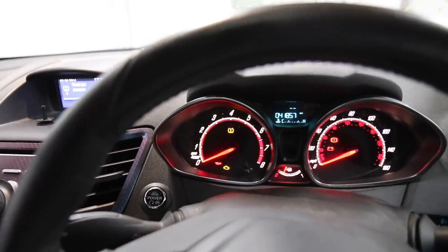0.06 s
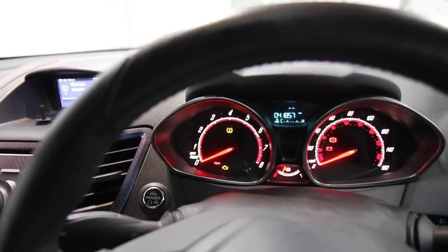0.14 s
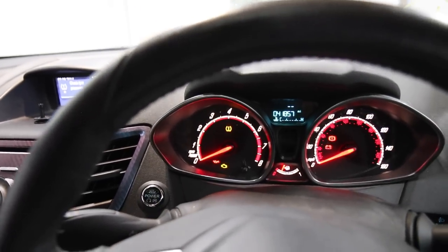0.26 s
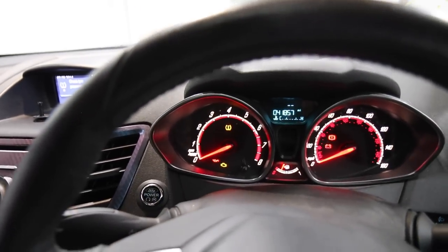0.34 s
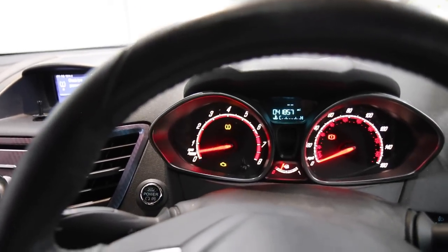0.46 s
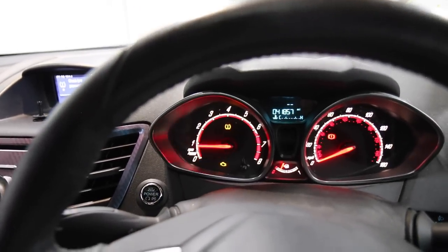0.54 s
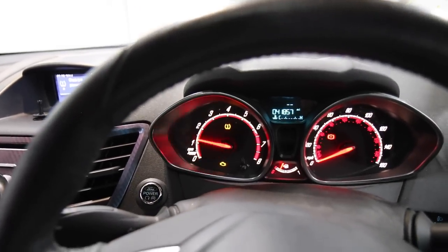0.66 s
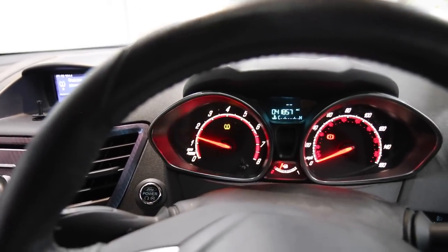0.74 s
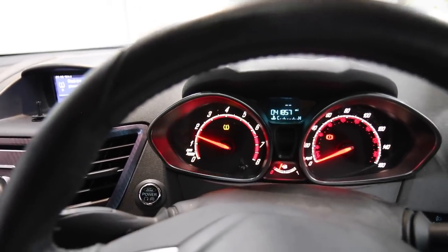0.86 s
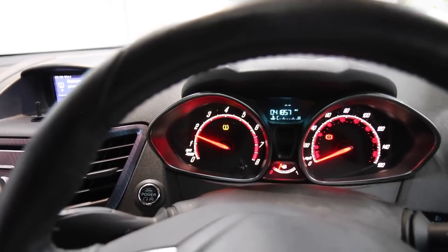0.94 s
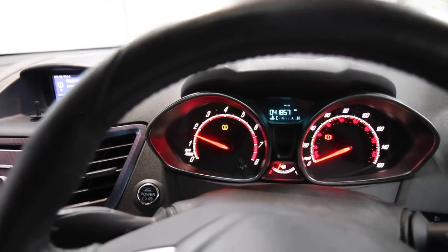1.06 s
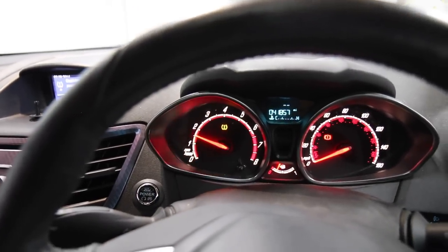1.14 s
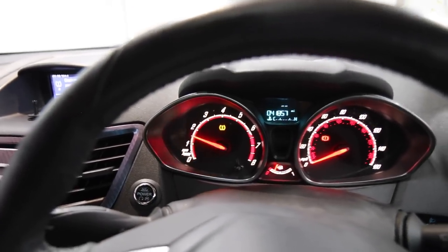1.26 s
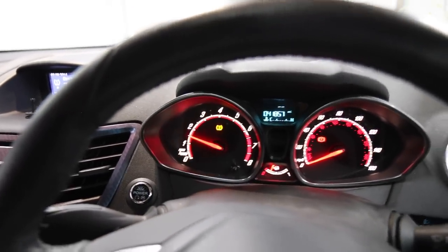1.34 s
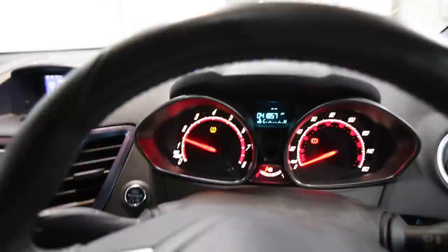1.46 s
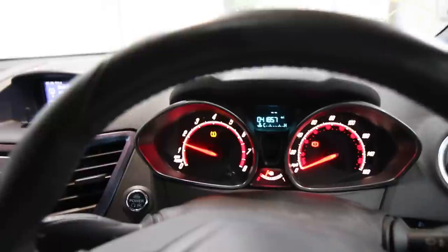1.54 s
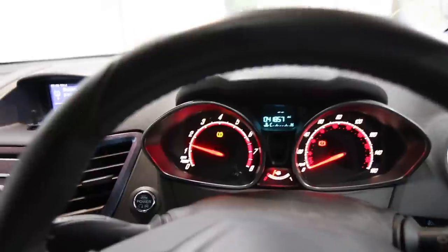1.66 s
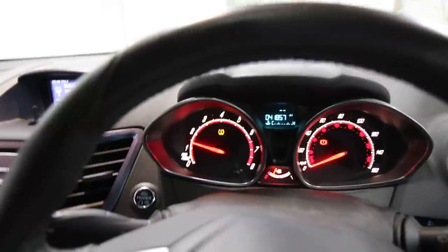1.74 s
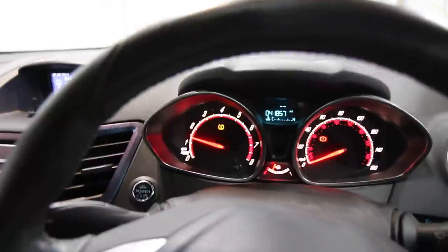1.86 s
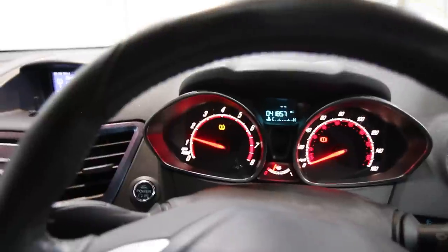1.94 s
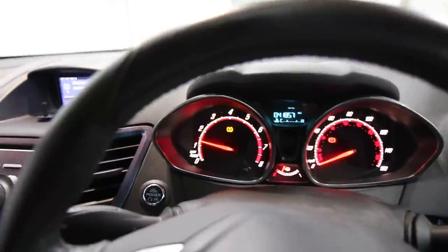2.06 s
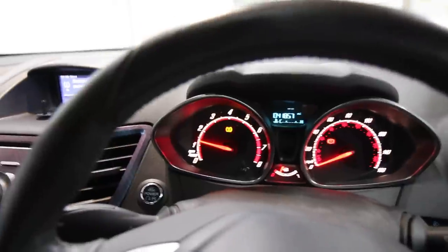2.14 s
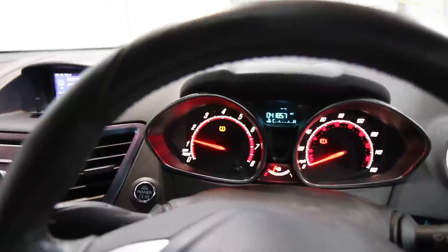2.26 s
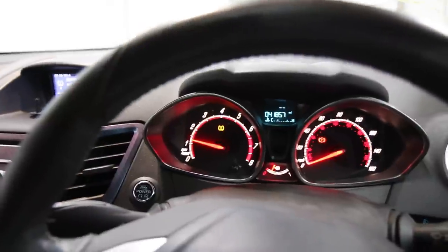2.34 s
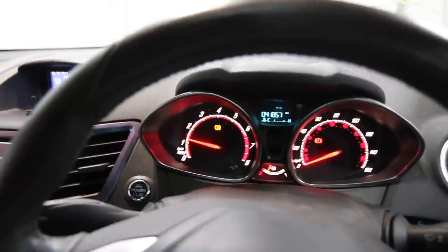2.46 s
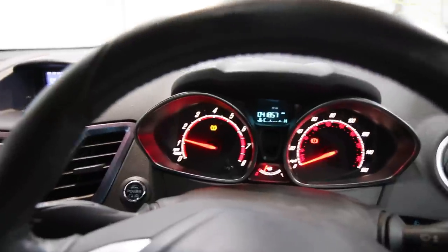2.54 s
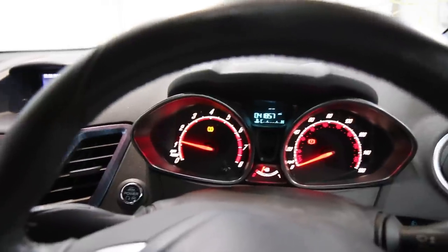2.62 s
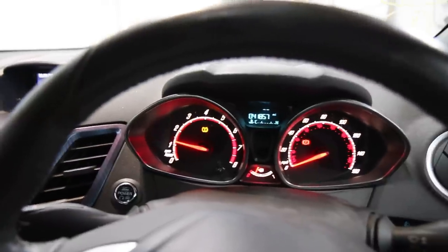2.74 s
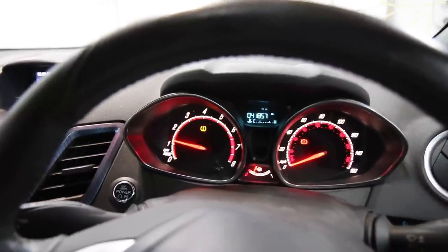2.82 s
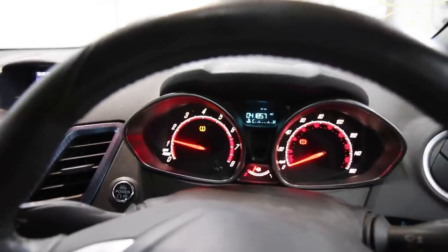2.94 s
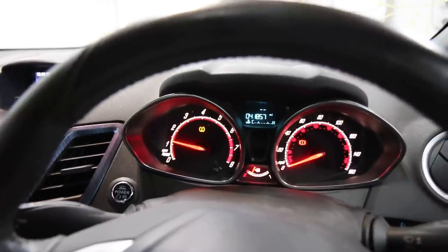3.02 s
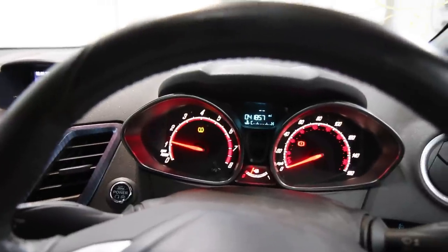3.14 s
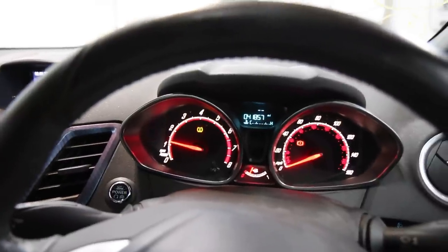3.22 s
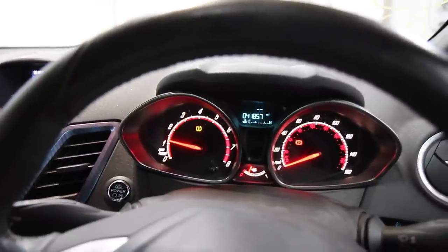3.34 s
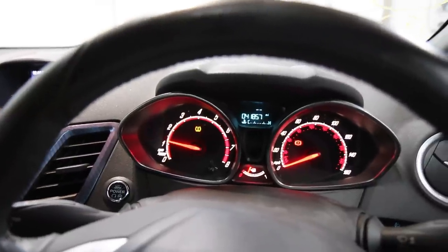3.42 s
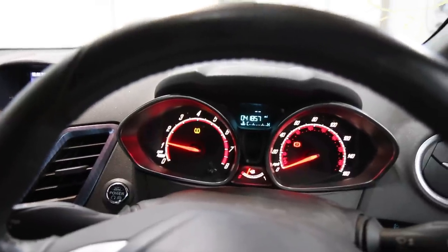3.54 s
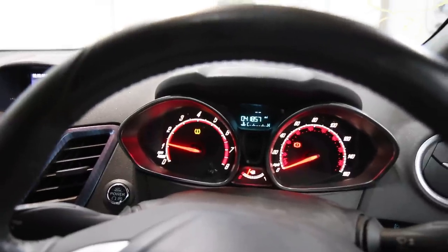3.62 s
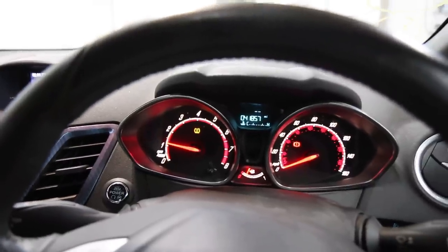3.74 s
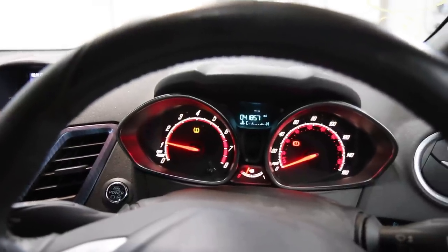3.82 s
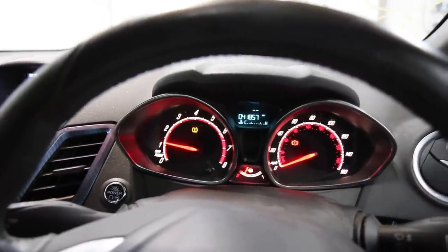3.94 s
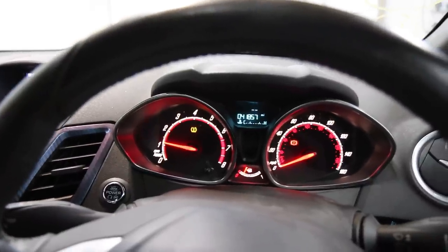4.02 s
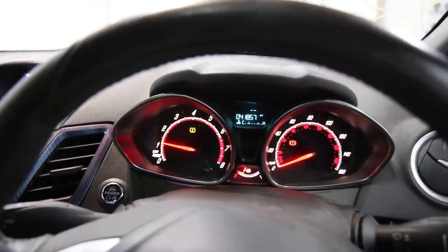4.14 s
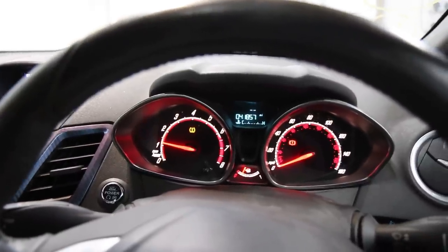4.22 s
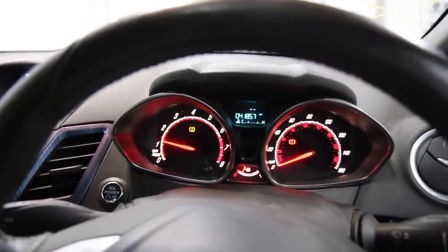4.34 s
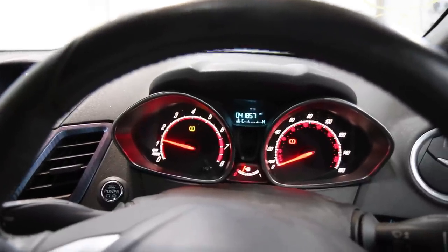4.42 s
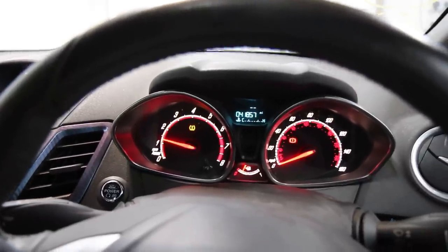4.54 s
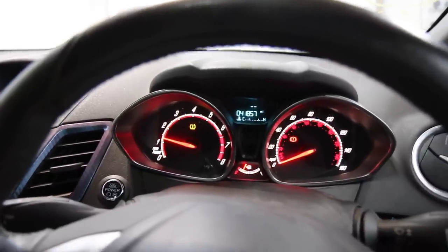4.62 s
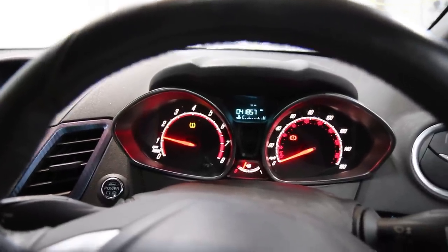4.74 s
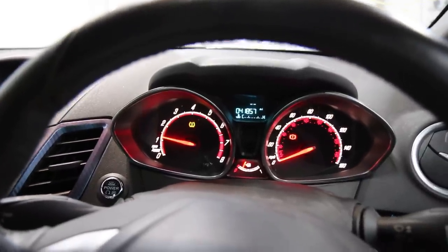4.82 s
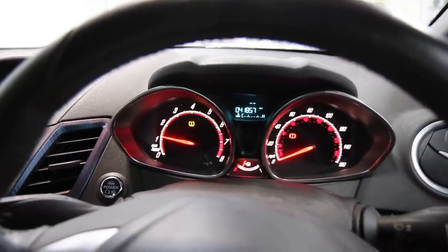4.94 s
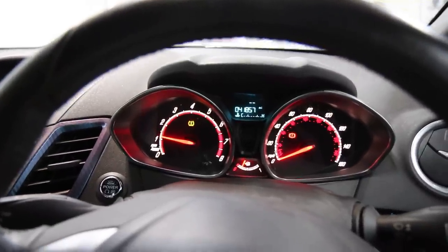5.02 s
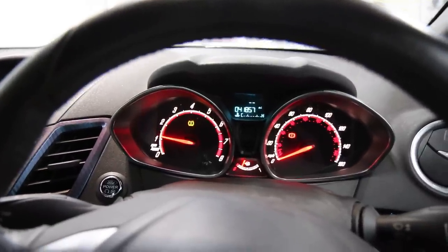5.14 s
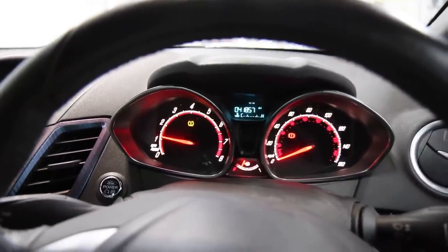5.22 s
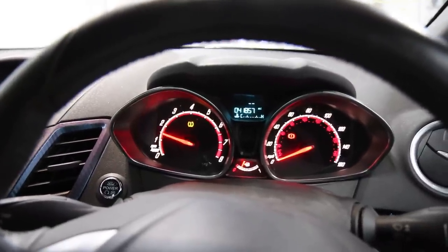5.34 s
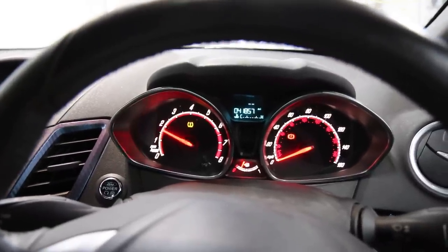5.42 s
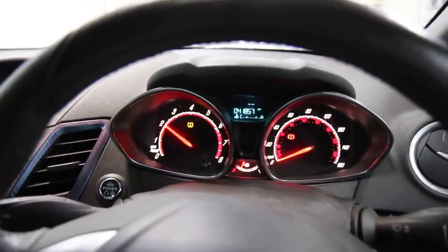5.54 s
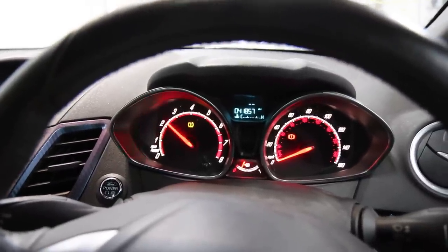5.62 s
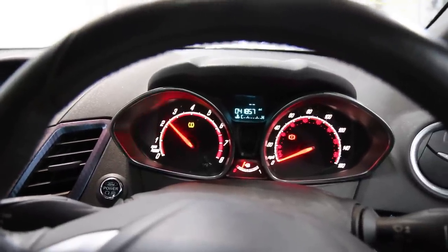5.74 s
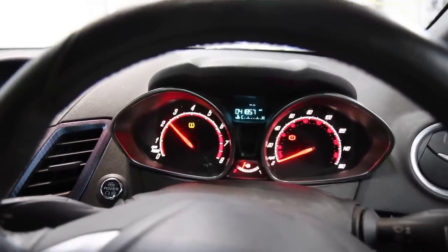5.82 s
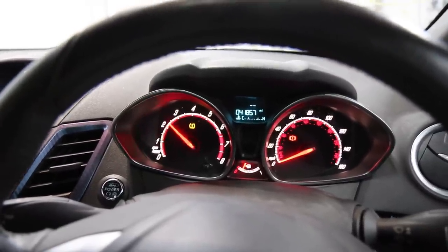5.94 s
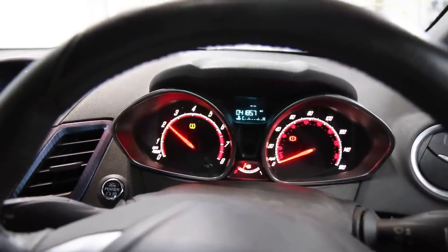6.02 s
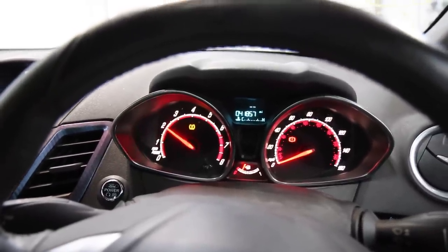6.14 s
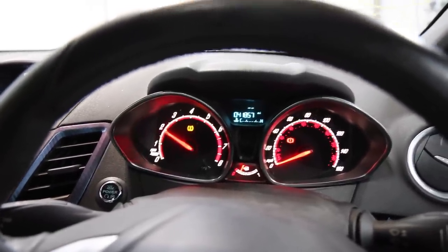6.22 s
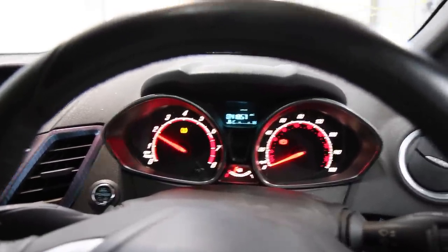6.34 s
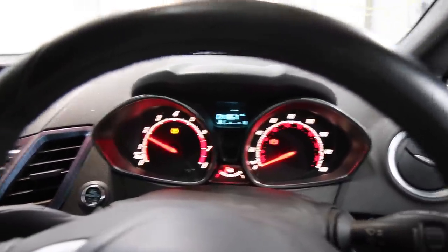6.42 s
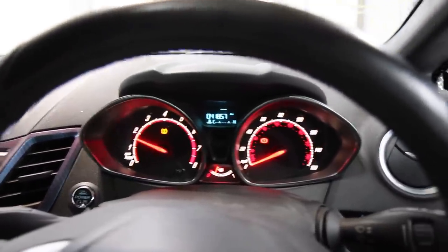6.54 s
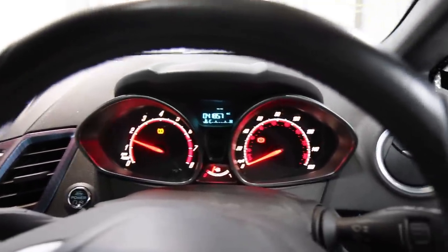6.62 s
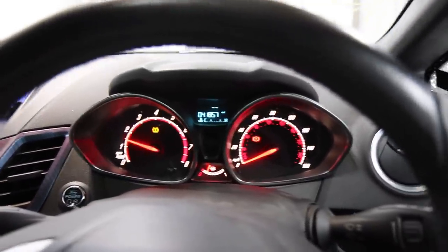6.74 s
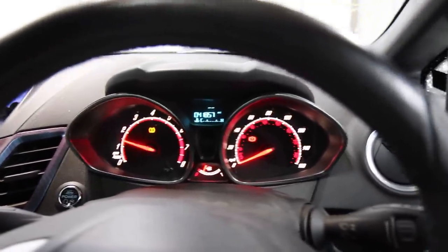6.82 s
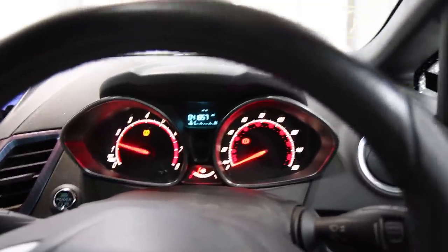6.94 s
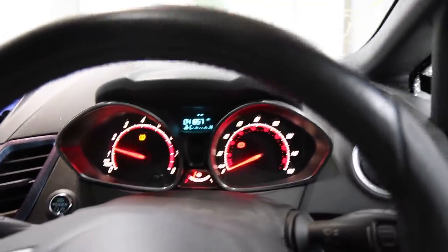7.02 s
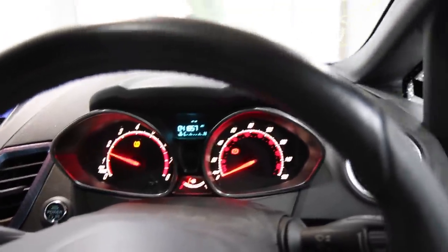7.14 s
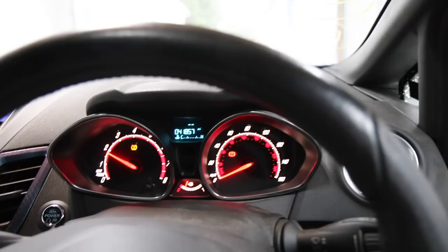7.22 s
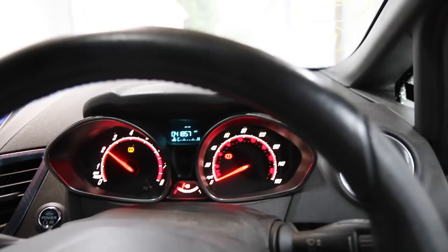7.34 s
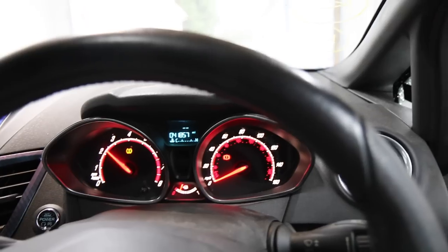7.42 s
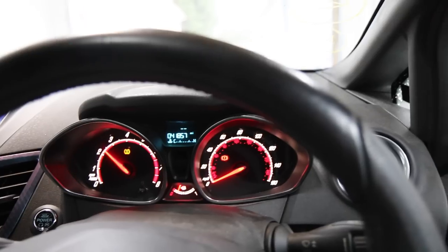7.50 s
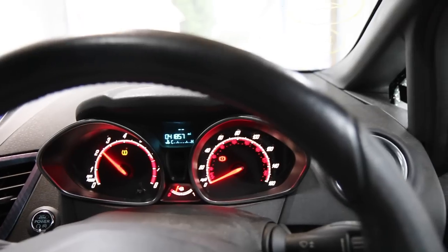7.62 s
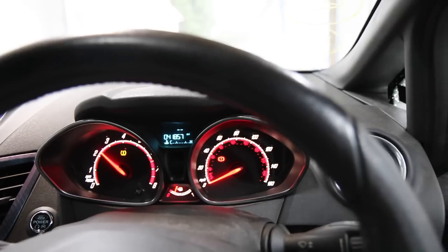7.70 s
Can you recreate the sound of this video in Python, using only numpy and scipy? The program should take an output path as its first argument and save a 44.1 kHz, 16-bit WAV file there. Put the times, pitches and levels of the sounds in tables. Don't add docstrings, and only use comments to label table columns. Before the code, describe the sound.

Inside a closed car, close to the driver's seat, a starter clunks and shudders for half a second before a four-cylinder engine catches and flares. It sinks into a deep, booming fast idle with soft trim knocks, tiny ticks and a faint rubber squeak. After a slight nudge of throttle come two quick growling revs, the second held to the end. A handheld microphone ducks under the bass.

```python
import sys
import numpy as np
from scipy import signal
from scipy.fft import rfft, irfft, next_fast_len
from scipy.io import wavfile
from scipy.ndimage import uniform_filter1d, minimum_filter1d, map_coordinates

SR = 44100
rng = np.random.default_rng(int(sys.argv[2]) if len(sys.argv) > 2 else 0)


def how_loud(loudness_db):
    steps = np.asarray(loudness_db, float) / 20
    return 10 ** steps


def store_wav(level_fs):
    pcm = np.round(np.clip(np.atleast_2d(level_fs), -1, 1) * 32767)
    wavfile.write(sys.argv[1], SR, pcm.T.astype(np.int16))


N = 342591

# time_s, firing_rate_hz
ENGINE_SPEED = [(0.2, 19.6), (0.43, 31), (0.62, 50), (0.8, 53.7), (1.95, 42.1), (2.5, 40.4), (4.12, 37.5),
                (4.36, 45.6), (4.72, 39), (5.18, 37.2), (5.5, 79), (5.66, 83), (6.1, 63.2), (6.55, 49.2),
                (6.97, 42.4), (7.33, 82.5), (7.55, 77.6), (7.77, 75.4)]
# time_s, load_over_idle_db
ENGINE_LOAD = [(.2, 3), (.62, 5.5), (1.3, 3), (2.05, 1), (4.1, -1.5), (4.36, 7), (4.7, 0.5), (5.1, -0.5),
               (5.22, 9), (5.33, 11), (5.7, 12.5), (6.0, 7), (6.5, -6.5), (6.85, -1.5), (7.06, 10),
               (7.2, 8.5), (7.45, 10), (7.77, 6)]
# order_pitch_hz, level_db_rms
FIRST_ORDER_PATH = [(15, -31), (30, -24), (40, -15.5), (45, -21.5), (52, -8.5), (60, -5.5), (73, -5.5),
                    (90, -22)]
SECOND_ORDER_PATH = [(30, -26.5), (64, -12), (76, -18), (89, -34.5), (101, -23), (111, -38.5), (125, -16),
                     (175, -40.5)]
THIRD_ORDER_PATH = [(60, -24.5), (113, -39), (120.5, -27), (126, -29.5), (133, -21.5), (150, -45),
                    (195, -28.5), (250, -21.5)]
UNEVEN_ORDER_PATH = [(10, -29), (21, -24.5), (29, -32), (33, -43), (39, -39.5), (45, -25.5), (57.5, -20),
                     (66, -49.5)]
# time_s, second_order_rise_db, half_length_s
SECOND_ORDER_SWELLS = [
    (4.19, 7.5, 0.073),
    (5.16, 8.5, 0.055),
    (6.97, 11, 0.046),
]
# centre_hz, width_hz, level_db
AIR_MODES = [(58.4, 2.1, 4), (74.75, 2.1, -10)]
# centre_hz, width_hz, level_db
CABIN_RESONANCES = [(136.8, 20, 4.5), (153.7, 2, -2), (182.1, 15, 1), (248.8, 26.5, 3.5), (324, 19.4, 1.5),
                    (370, 45, -3), (445.9, 12.7, 3), (484.4, 12, -1), (575, 42, -13.5), (665, 65, -12),
                    (790, 180, -19)]
# frequency_hz, density_db_per_hz
PANEL_SPECTRUM = [(26, -31.5), (45, -4.5), (64, -0.5), (97, -11.5), (156, -18), (212, -18.5), (284, -34.5),
                  (443, -10), (478, -35), (562, -46), (600, -42), (780, -75), (1320, -120)]
# frequency_hz, density_db_per_hz
VALVE_SPECTRUM = [(310, -19.5), (520, 4), (592, -15), (679, -2.5), (1010, -10.5), (1310, -15.5),
                  (1970, -25), (2160, -26), (2770, -39.5), (3200, -34.5), (4160, -64), (7040, -120)]
# time_s, rise_db, half_length_s
VALVE_CLATTER = [
    (0, 17.5, 0.03),
    (.24, 11, .18),
    (5.27, 4, 0.1),
    (7.07, 3, 0.076),
    (7.55, 2.5, .15),
]
# centre_hz, width_hz, level_db
WHINE_RESONANCES = [(2080, 60, -4), (2186, 70, 0), (2235, 60, -3), (2390, 60, -5), (4000, 300, -9)]
# time_s, rise_db, half_length_s
WHINE_SWELLS = [(0, 13.5, .3), (.6, 20, 0.18), (1.7, 10.5, .5), (2.5, 14, .15), (3.42, 17, 0.17),
                (3.95, 13, .06), (6.03, 15.5, 0.11), (6.6, 16, 0.19), (7.57, 14, .1)]
# time_s, rise_over_shudder_db
COMPRESSION_STROKES = [
    (0, 10),
    (0.274, 20),
    (0.404, 21),
    (0.491, 19.5),
    (.56, 14),
]
# frequency_hz, density_db_per_hz
SHUDDER_SPECTRUM = [(12, -47), (20, -20), (48, -6.5), (65, 2), (97, -7), (150, -11.5), (193, -11),
                    (280, -47), (300, -21), (390, -48), (660, -120)]
# time_s, level_db
PINION_GRIND = [
    (0.17, -63),
    (0.246, -38),
    (0.284, -39),
    (0.344, -64),
    (0.36, -47),
]
# start_s, peak_db, thud_db, bright_db, rise_s
TRIM_KNOCKS = [(0.132, -44, -23, -59, 0.035), (0.19, -55, -19, -74.5, 0.0087),
               (0.311, -43, -17.5, -54, 0.018), (0.363, -34.5, -35, -45, 0.014),
               (0.384, -45, -25.5, -54.5, 0.014), (2.101, -39.5, -9.5, -49.5, 0.015),
               (2.264, -34, -17, -38, 0.015), (2.448, -54, -51, -69, 0.014),
               (2.631, -39.5, -19.5, -57, 0.0069), (2.99, -45, -25.5, -52.5, 0.018),
               (3.015, -45, -31, -51.5, 0.014), (3.054, -48.5, -28, -59, 0.024),
               (3.12, -52, -21.5, -70, 0.011), (3.178, -49.5, -26, -73, 0.0061),
               (3.721, -52, -26.5, -61, 0.013)]
# frequency_hz, density_db_per_hz
TRIM_SPECTRUM = [(500, -42.5), (750, 3), (1000, 11.5), (1700, 3.5), (3000, -4), (4000, -13)]
# start_s, peak_db, pitch_hz
DRY_TICKS = [(0.4617, -46.5, 4770), (0.5117, -45.5, 4910), (0.6444, -52, 4070), (1.7524, -40, 4760),
             (2.8439, -51, 3999), (2.855, -46, 5000), (2.8706, -47, 4960), (2.8915, -49, 5730)]
# start_s, peak_db, pitch_hz
RUBBER_SQUEAKS = [
    (2.976, -38.5, 930),
    (3.052, -33.5, 912),
]
# frequency_hz, density_db_per_hz
RUSTLE_SPECTRUM = [(1470, -34.5), (2500, 2.5), (2760, -1.5), (3110, 0), (4680, -1), (5430, -3.5),
                   (7730, -9), (11000, -24.5), (14300, -40), (22000, -120)]
# time_s, rise_db, half_length_s
CLOTH_SHIFTS = [(0, 13.5, 0.078), (.2, 9.5, 0.12), (.4, 6.5, 0.21), (1.35, 4.5, 0.17), (2.0, 6, 0.2),
                (2.6, 5.5, 0.34), (5.28, 5.5, 0.06), (7.07, 5.5, 0.055), (7.65, 2.5, 0.087)]
# frequency_hz, density_db_per_hz
HISS_SPECTRUM = [(880, -35.5), (1500, 0.5), (3250, -10), (4040, -9), (15100, -11), (16000, -17)]

IDLE_HZ, INERTIA_S = 40, .09
GROWL_DB, GEAR_DB, WHINE_DB, RUSTLE_DB, HISS_DB = -29.5, -48, -78, -62, -66
BOOM_GROWS, UPPER_GROWS, PANEL_GROWS, GEAR_GROWS = 0.34, .4, 1, .15
REV_GROWS, RUSTLE_GROWS = 1.09, .9
BUILD_S = 0.03
BETWEEN_DB, STROKE_S = -33, 0.052
LIMIT_DB, SQUEEZE = -5, 0.62
HOLD_S, ATTACK_S, MEMORY_S, MEMORY_SHARE = .12, 0.0098, 0.72, 0.49


def engine():
    hz, cycles, load_db = firing()
    running = np.clip((np.arange(N) / SR - .2) / 0.077, 0, 1)
    return running * (boom(hz, cycles, load_db) + growl(hz, cycles, load_db) + panels(load_db))


def firing():
    hz = uniform_filter1d(curves(ENGINE_SPEED)[0], round(INERTIA_S * SR), mode="nearest")
    return hz, np.cumsum(hz) / SR, curves(ENGINE_LOAD)[0]


def boom(hz, cycles, load_db):
    def tone(order, lag):
        return np.sqrt(2) * np.sin(2 * np.pi * (order * cycles + lag))

    first_db = along(FIRST_ORDER_PATH, hz) + BOOM_GROWS * load_db
    second_db = along(SECOND_ORDER_PATH, hz * 2) + UPPER_GROWS * load_db + swells(SECOND_ORDER_SWELLS)
    third_db = along(THIRD_ORDER_PATH, hz * 3) + UPPER_GROWS * load_db
    uneven_db = along(UNEVEN_ORDER_PATH, hz * 3 / 4) + UPPER_GROWS * load_db

    out = lagged(how_loud(first_db + 0.41 * wobble(1.8)), BUILD_S) * tone(0.99, 0.21)
    out += how_loud(second_db + 2.1 * wobble(9.9)) * tone(2, 0.28)
    out += how_loud(third_db + 3.7 * wobble(14)) * tone(3, 0.27)
    uneven = tone(3 / 4, 0.084) + how_loud(-10.5) * tone(5 / 4, 0.93) + how_loud(-14) * tone(3 / 2, 0.082)
    out += how_loud(uneven_db + 1.9 * wobble(31)) * uneven
    return out + how_loud(-4) * filtered(out, lambda f: resonant(AIR_MODES, f))


def growl(hz, cycles, load_db):
    growl_db = GROWL_DB + load_db
    out, grid = np.zeros(N), np.arange(1500.)
    response = resonant(CABIN_RESONANCES, grid)
    ringing = response * np.abs(response) ** 0.74
    for quarter in [7, 9, 10, 11, *range(13, 69)]:
        order_hz = hz * quarter / 4
        order_db = -.1 if quarter % 4 == 0 else -8 if quarter % 2 == 0 else -16
        gain = np.interp(order_hz, grid, ringing)
        gain *= how_loud(0.48 * (growl_db + 26.5) * np.log2(order_hz / 330))
        lag = rng.random() * (quarter % 4 > 0)
        wave = np.real(gain * np.exp(2j * np.pi * (quarter / 4 * cycles + lag)))
        out += how_loud(order_db + 2.1 * wobble(9)) * wave
    return how_loud(growl_db) * steady(out, seconds=0.89)


def panels(load_db):
    shake = how_loud(4.1 * wobble(16)) * rush(PANEL_SPECTRUM)
    return how_loud(GROWL_DB + PANEL_GROWS * load_db) * shake


def valve_gear():
    hz, cycles, load_db = firing()
    gear_db = GEAR_DB + GEAR_GROWS * load_db + REV_GROWS * speed_db(hz) + swells(VALVE_CLATTER)
    return how_loud(gear_db + 0.5 * np.cos(2 * np.pi * cycles) + 2.2 * wobble(11)) * rush(VALVE_SPECTRUM)


def gear_whine():
    whine = unit(filtered(rng.standard_normal(N), lambda f: resonant(WHINE_RESONANCES, f) ** 2))
    return how_loud(WHINE_DB + swells(WHINE_SWELLS) + 1.0 + 1.5 * wobble(6.7)) * whine


def starter():
    t = np.arange(N) / SR
    fade = np.clip((.7 - t) / 0.05, 0, 1)
    strokes = [(s, db, STROKE_S) for s, db in COMPRESSION_STROKES]
    shake = how_loud(BETWEEN_DB + swells(strokes) + 3.6 * wobble(30)) * rush(SHUDDER_SPECTRUM)
    rattle = rush([(200, 0.0), (380, 15.5), (480, -15.5), (1700, -13)])
    shake += how_loud(-38.0 + 3.2 * wobble(26)) * rattle
    grind = rush([(1950, -24), (2120, 11), (2250, 6), (2480, 0), (2650, -30.0)])
    grind *= how_loud(curves(PINION_GRIND)[0] + 1.1 * wobble(60)) * (t > .17) * (t < .36)
    brushes = rush([(4500, -14.5), (5900, 11.5), (6300, -5), (7500, -18.0)])
    return fade * shake + how_loud(-63.0) * (t < .41) * brushes + fade * 0 + grind


def cabin_noises():
    out, size = np.zeros(N + SR), SR // 4
    t = np.arange(size) / SR
    for s, db, thud_db, bright_db, rise in TRIM_KNOCKS:
        fall = np.sqrt(t / rise) * np.exp(-(t / rise) ** 2 / 2)
        grit = unit(uniform_filter1d(rng.standard_normal(size), size=40))
        thud = rush([(120, -2.5), (175, -3.0), (300, -10), (520, -24), (900, -28)], size=size)
        bright = rush([(2800, 1), (5500, 6), (9000, -1.5), (15500, -25.0)], size=size)
        knock = how_loud(db + 5.0) * rush(TRIM_SPECTRUM, size=size)
        knock += how_loud(thud_db + 1.5) * thud + how_loud(bright_db + 3.5 + 3.6 * grit) * bright
        out[round(s * SR):][:size] += fall * knock
    for s, db, hz in DRY_TICKS:
        band = rush([(hz * 0.63, -18), (hz, 0), (hz * 1.63, -16)], size=size)
        out[round(s * SR):][:size] += how_loud(db + 5.0 - 60 * t / 0.038) * (1 - np.exp(-t / 0.0033)) * band
    for s, db, hz in RUBBER_SQUEAKS:
        band = rush([(hz * 0.956, -22), (hz, 0), (hz * 1.044, -20)], size=size)
        out[round(s * SR):][:size] += how_loud(db + 4.5 - 60 * t / 0.12) * (1 - np.exp(-t / 0.0042)) * band
    return out[:N]


def air():
    rustle_db = RUSTLE_DB + RUSTLE_GROWS * speed_db(firing()[0]) + swells(CLOTH_SHIFTS)
    rustle = how_loud(rustle_db - 2.5 + 1.0 * wobble(22)) * rush(RUSTLE_SPECTRUM)
    return rustle + how_loud(HISS_DB + 5.5) * rush(HISS_SPECTRUM)


def speed_db(hz):
    return 20 * np.log10(np.maximum(hz / IDLE_HZ, 1))


def unit(x):
    return x / np.sqrt(np.mean(x ** 2) + 1e-20)


def along(points, hz):
    f, v = np.transpose(points)
    return np.interp(np.log(hz + 1), np.log(f + 1), v, -120, -120)


def curves(rows):
    s, *cols = np.transpose(rows)
    return [np.interp(np.arange(N) / SR, s, c) for c in cols]


def wobble(rate):
    knots = rng.standard_normal(int(N * rate / SR) + 4)
    return map_coordinates(knots, [np.arange(N) * rate / SR], order=1)


def swells(rows):
    t = np.arange(N) / SR
    return sum(db * np.exp(-((t - s) / half) ** 2) for s, db, half in rows)


def filtered(x, response):
    m = next_fast_len(len(x) + 8192)
    return irfft(rfft(x, m) * response(np.fft.rfftfreq(m, 1 / SR)), m)[:len(x)]


def resonant(modes, f):
    total = 0
    for k, (centre, width, db) in enumerate(modes):
        damping = 1j * f * width
        total = total + (-1) ** k * how_loud(db) * damping / (centre * centre - f * f + damping)
    return total


def rush(spectrum, size=N):
    return unit(filtered(rng.standard_normal(size), lambda hz: how_loud(along(spectrum, hz))))


def steady(x, seconds):
    return x / np.sqrt(np.abs(uniform_filter1d(x ** 2, round(seconds * SR))) + 1e-9)


def lagged(x, seconds):
    keep = np.exp(-1 / (seconds * SR))
    return signal.lfilter([1 - keep], [1, -keep], x)


def gain_control(x):
    cut_db = -SQUEEZE * np.maximum(20 * np.log10(np.abs(x) + 1e-9) - LIMIT_DB, 0)
    hold = round(HOLD_S * SR)
    cut_db = minimum_filter1d(cut_db, hold, origin=(hold - 1) // 2)
    return x * how_loud(lagged(cut_db, ATTACK_S) + MEMORY_SHARE * lagged(cut_db, MEMORY_S))


def scene():
    return (engine() + valve_gear() + gear_whine() + starter() + cabin_noises() + air())[None]


def band_limit(x):
    return signal.sosfilt(signal.butter(12, 16810, fs=SR, output="sos"), x)


def record(dry):
    ends = np.clip(np.minimum(np.arange(N) / 120, np.arange(N)[::-1] / 20), 0, 1)
    heard = gain_control(filtered(dry[0], lambda f: f ** 4 / (f ** 4 + 24 ** 4)))
    heard = heard / (1 + np.abs(heard / .95) ** 6) ** (1 / 6)
    return band_limit(ends * heard[None])


dry = scene()
out = record(dry)
store_wav(out)
```